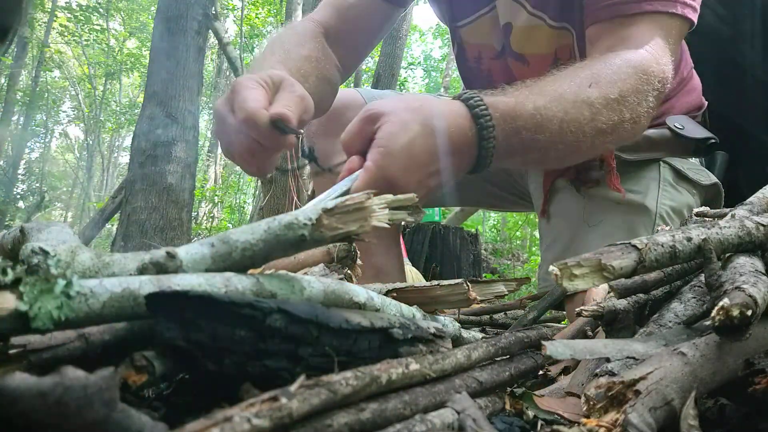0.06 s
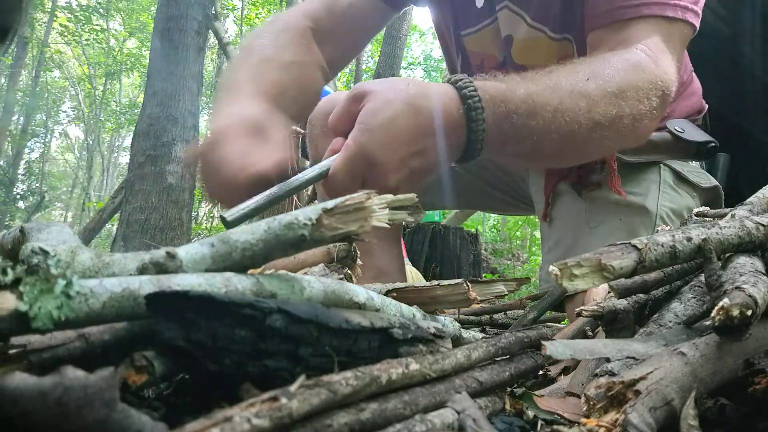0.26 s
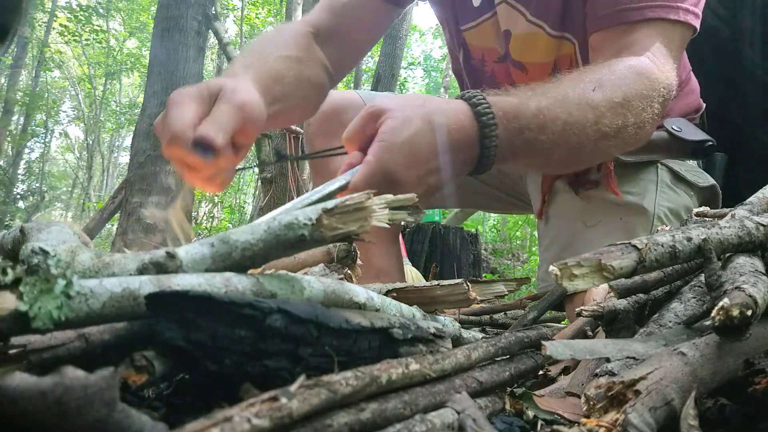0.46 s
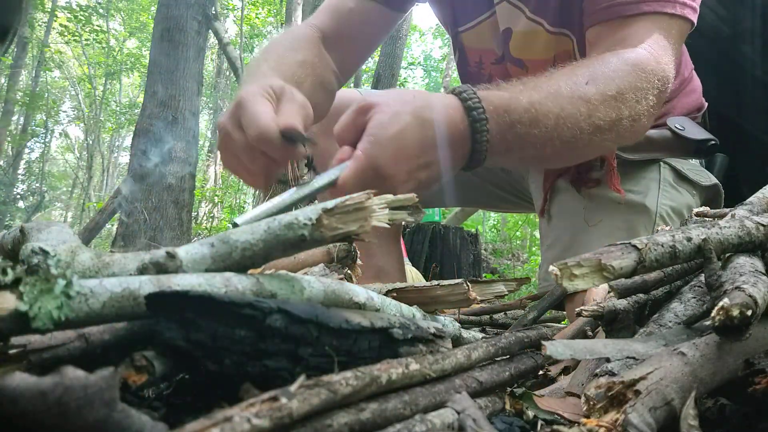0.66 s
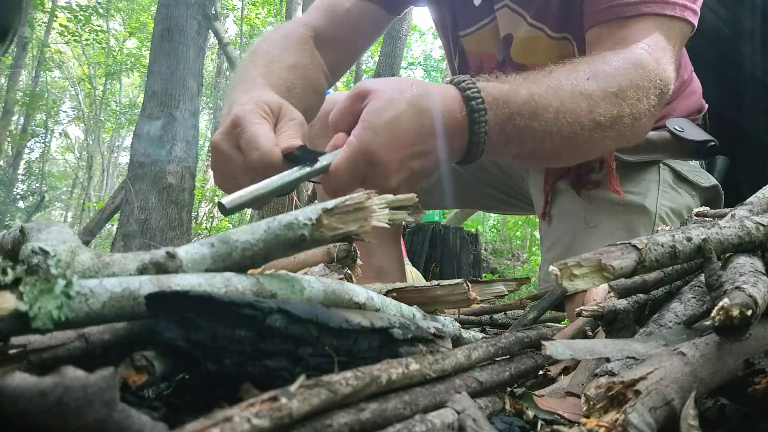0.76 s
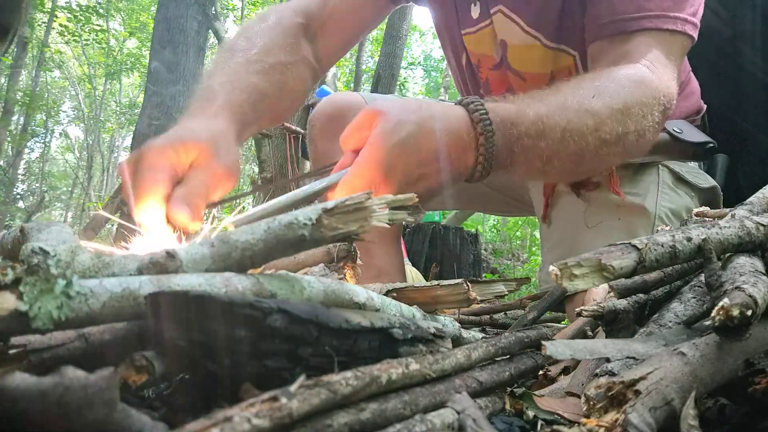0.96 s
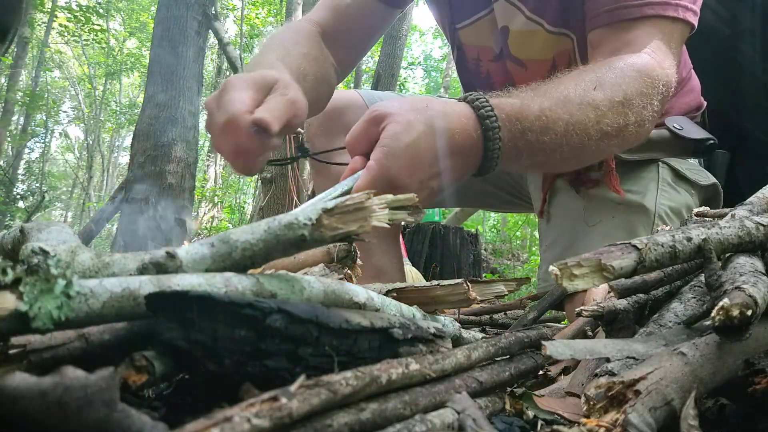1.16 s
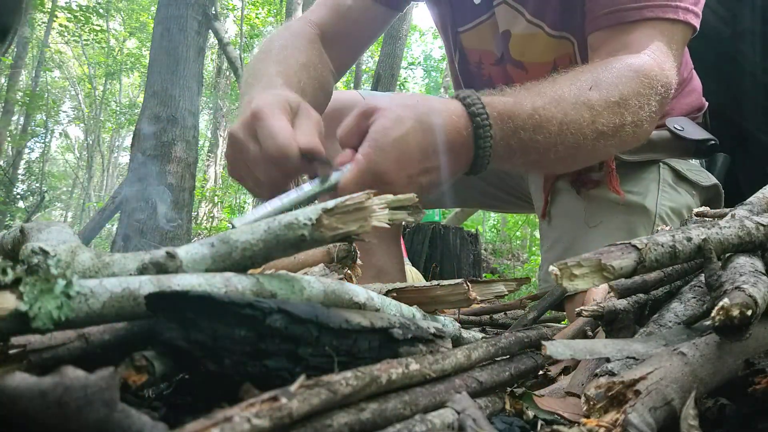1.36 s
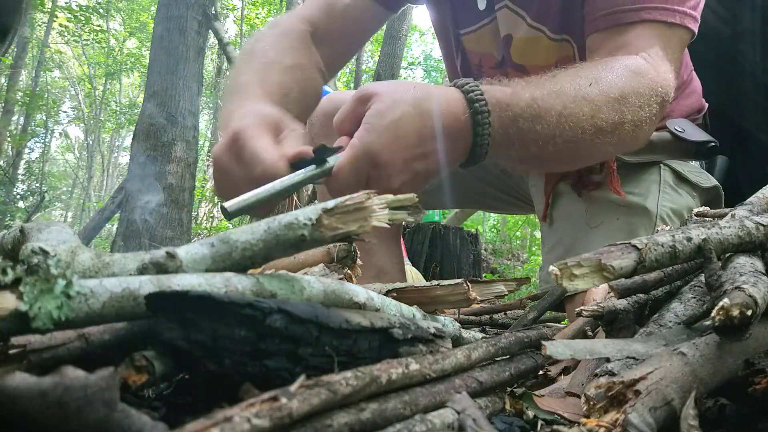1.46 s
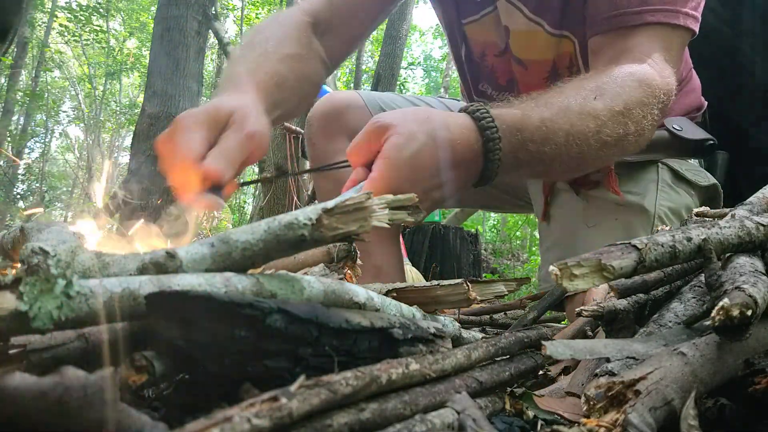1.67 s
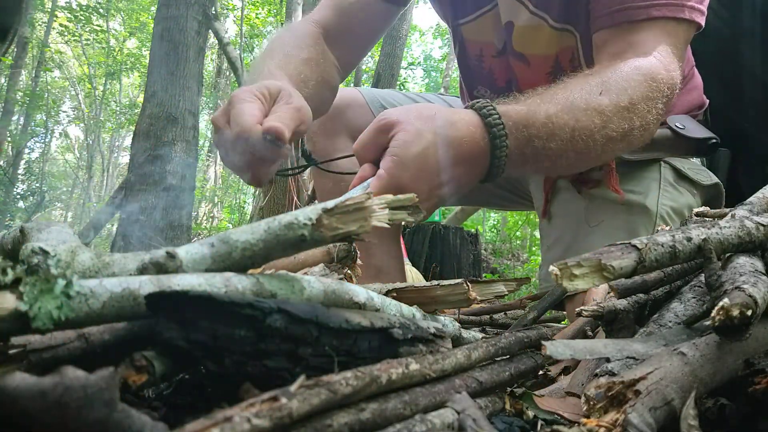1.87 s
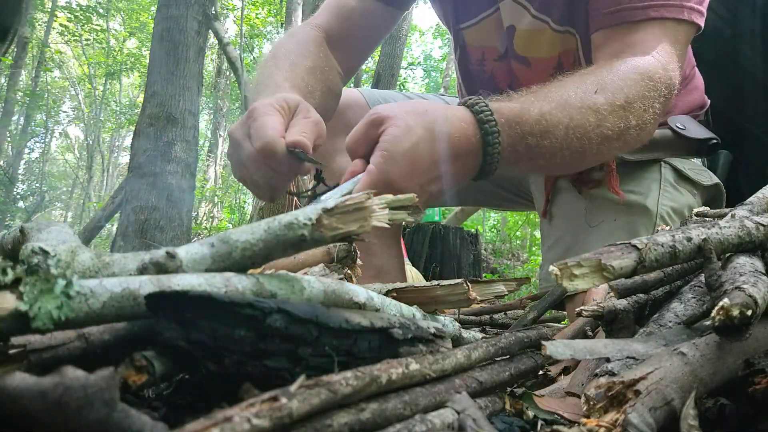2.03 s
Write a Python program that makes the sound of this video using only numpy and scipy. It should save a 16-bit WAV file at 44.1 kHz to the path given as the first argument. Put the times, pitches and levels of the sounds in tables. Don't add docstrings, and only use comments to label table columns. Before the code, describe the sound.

A steel striker scrapes a fire-starting rod, very close, in stereo. A sharp tap at 0.15 s leads into a strong bright rasp until 0.4, with dry twigs rattling. A metallic click comes at 0.68, a second scrape at 0.88, another tap at 1.35 and a third scrape at 1.48. Spark crackles and twig ticks trail to 1.85. Faint birds, insects, airy hiss and low hum continue behind.

```python
import sys
import numpy as np
from scipy import signal
from scipy.fft import rfft, irfft
from scipy.io import wavfile

SR = 44100
rng = np.random.default_rng(int(sys.argv[2]) if len(sys.argv) > 2 else 0)


def boost_factor(decibels):
    exponent = np.asarray(decibels, float) / 20
    return 10 ** exponent


def generate_wav(signal):
    frames = np.transpose(np.atleast_2d(signal))
    scaled = np.clip(frames, -1, 1) * 32767
    pcm = np.round(scaled).astype(np.int16)
    wavfile.write(sys.argv[1], SR, pcm)


N = 92610
HZ = np.fft.rfftfreq(N, 1 / SR) + 1


def in_time(rows):
    s, db = np.transpose(rows)
    return boost_factor(np.interp(np.arange(N) / SR, s, db, -150, -150))


def at_hz(points):
    points = np.array(points)
    return np.interp(np.log(HZ), np.log(points[:, 0] + 1), points[:, 1])


def rms_one(x):
    return x / np.sqrt(np.mean(x ** 2) + 1e-20)


def colour(x, spectrum):
    cepstrum = irfft(np.log(boost_factor(at_hz([(10, -70)] + list(spectrum)))), N)
    cepstrum[1:N // 2] *= 2
    cepstrum[N // 2 + 1:] = 0
    return rms_one(irfft(rfft(x) * np.exp(rfft(cepstrum)), N))


def peak(x, hz, width_hz):
    r = np.exp(-np.pi * width_hz / SR)
    top = np.array([1, 0, -1]) * (1 - r * r) / 2
    return signal.lfilter(top, [1, -2 * r * np.cos(2 * np.pi * hz / SR), r * r], x + 1e-18)


def drift(rate_hz):
    r = np.exp(-2 * np.pi * rate_hz / SR)
    wander = signal.lfilter([1], [1, -2 * r, r * r], rng.standard_normal(N + SR))
    return rms_one(wander[SR:])


def grains(per_s, spread_db):
    strength = boost_factor(spread_db * np.minimum(rng.exponential(1, N), 4))
    signed = strength * rng.standard_normal((3, N))
    return signed * (rng.random(N) < per_s / SR)


def puffs(rows, rise_s=.00045):
    out = np.zeros(N + SR)
    for s, db, length in rows:
        age = np.arange(int(4 * length * SR)) / SR
        start = int(s * SR)
        out[start:start + len(age)] += boost_factor(db - 20 * age / length) * np.minimum(age / rise_s, 1)
    return out[:N]


def scatter(x, t60_s):
    t = np.arange(N) / SR
    tail = rng.standard_normal((2, N)) * boost_factor(-60 * t / t60_s) * (t > .002)
    echoes = irfft(rfft(x, 2 * N) * rfft(tail, 2 * N))[:, :N]
    return echoes / np.sqrt(np.sum(tail[0] ** 2))


# f/Hz, common share [0-1]
PORT_LIKENESS = [(150, .96), (700, .92), (1400, .72), (2800, .62), (5000, .32), (12000, .35)]


def ports(three):
    share, w = at_hz(PORT_LIKENESS), rfft(three)
    return irfft(np.sqrt(share) * w[0] + np.sqrt(1 - share) * w[1:], N)


# f/Hz, level/dB (per Hz)
AIR_COLOUR = [(240, -13.5), (700, -13), (2600, -21.5), (3200, -24), (6500, -25), (10000, -21),
              (15000, -24.5), (15800, -51)]


def air():
    hiss = colour(ports(rng.standard_normal((3, N))), AIR_COLOUR)
    return boost_factor(-52.5 - 9.5) * hiss


# f/Hz, width [Hz], level/dB
HUM_TONES = [(80, 19.6, -65.5), (116.5, 2.26, -63.5), (135.6, 2.9, -65), (160.26, 3.1, -63),
             (211, 4, -74.5), (235, 6.1, -73)]


def hum():
    return sum(boost_factor(db) * rms_one(peak(rng.standard_normal(N), hz, width)) for hz, width, db in HUM_TONES)


def insects():
    pitch_hz, width_hz, level_db, throb_db = 7950, 800, -61.5, .5
    band = np.exp(-(2 * (HZ - pitch_hz) / width_hz) ** 2)
    buzz = rms_one(irfft(rfft(rng.standard_normal((2, N))) * band, N))
    return boost_factor(level_db + throb_db * drift(69)) * buzz


# t/s, length [s], start f/Hz, end f/Hz, level/dB
BIRD_WHISTLES = [(.622, .062, 3560, 2900, -52), (1.062, .065, 3760, 2900, -55),
                 (1.828, .05, 3200, 2850, -60), (1.385, .03, 3600, 3400, -70), (1.07, .12, 3740, 3680, -68),
                 (.39, .09, 1850, 2270, -64), (.47, .1, 2270, 2290, -64), (.74, .13, 1580, 1800, -68),
                 (1.362, .065, 1700, 2020, -58), (1.41, .045, 2020, 1980, -60),
                 (1.14, .08, 1600, 1620, -75), (2.06, .06, 1650, 1850, -70)]


def birds():
    level_db, fade_db, wet_db, wood_t60_s = 3.5, 6, -3, .9
    t, out = np.arange(N) / SR, np.zeros(N)
    for s, length, from_hz, to_hz, db in BIRD_WHISTLES:
        u = np.clip((t - s) / length, 0, 1)
        glide = from_hz + (to_hz - from_hz) * np.sin(np.pi * u / 2) ** 2
        fade = fade_db * u * (to_hz < from_hz)
        swell = np.sqrt(2 * np.sin(np.pi * u).clip(0))
        out += boost_factor(db + level_db - fade) * swell * np.sin(2 * np.pi * np.cumsum(glide) / SR)
    return out + boost_factor(wet_db) * scatter(out, wood_t60_s)


# t/s, level/dB
TWIG_SHOVES = [
    [(0, -62), (.138, -62), (.2, -52.5)],
    [(.2, -63), (.268, -53), (.28, -36), (.335, -38.5), (.42, -61), (.62, -70)],
    [(.872, -78), (.886, -45), (.92, -41), (.985, -45), (1.01, -55.5), (1.15, -63), (1.17, -95)],
    [(1.45, -83), (1.5, -43.5), (1.525, -36), (1.56, -43.5), (1.62, -51), (1.805, -57), (1.82, -97)],
]
# f/Hz, level/dB (per Hz)
TWIG_COLOUR = [(60, -14), (150, -7.5), (450, -3), (1200, -2), (2600, -2), (2900, -8), (3150, -6),
               (6000, -19.5), (9000, -23)]


def twig_rattle():
    clicks = grains(5000, 3)
    rattle = 0
    for k, hz in enumerate(150 * 2 ** np.arange(0, 6, .75)):
        clump = boost_factor(2.5 * drift(40))
        rattle = rattle + peak(clicks, hz, hz * .6) * clump * (-1) ** k
    shove = sum(in_time(curve) for curve in TWIG_SHOVES)
    return boost_factor(5) * colour(rattle, TWIG_COLOUR) * shove * boost_factor(.86 * drift(180))


# t/s, peak level/dB, f/Hz
TWIG_TICKS = [(0.235, -19.5, 6800), (0.326, -19, 2580), (1.524, -23.5, 2540), (1.619, -47, 2320),
              (1.639, -51, 2420), (1.694, -40, 2290), (1.722, -48, 2550), (1.744, -40.5, 2330),
              (1.757, -43, 2500), (1.766, -53, 2470), (0.417, -56, 1910), (.44, -50, 1490),
              (.458, -59, 1500), (0.477, -45, 2650), (0.495, -34, 1570), (0.529, -63, 1880),
              (0.578, -41.5, 2630), (1.027, -30.5, 1500), (1.082, -36.5, 1410), (1.137, -34.5, 1420),
              (1.303, -45, 2100), (1.322, -63, 4200), (1.667, -32, 2670), (1.735, -23, 2290),
              (1.777, -29.5, 2360), (1.804, -40.5, 2400), (1.853, -32.5, 2360), (1.998, -43, 2440)]


def twig_ticks():
    level_db, length_s, rise_s, cycles = 3.5, .009, .003, 6
    white, out = rng.standard_normal((3, N)), np.zeros((3, N))
    for s, db, hz in TWIG_TICKS:
        burst = white * puffs([(s, db + level_db, length_s)], rise_s)
        out += 1.8 * peak(peak(burst, hz, hz / cycles * 2), hz, hz * .23)
        if hz < 4000:
            out += 1.12 * peak(peak(burst, 1260, 1500), 900, 3000)
    return out


# t/s, peak level/dB, low share level/dB, top share level/dB, rod ring level/dB
STEEL_TAPS = [
    (.15, -9.5, -23, 5, -5),
    (0.3452, -18, -45, 16, -4),
    (0.6755, -17, -30, -2, 2),
    (1.346, -19, -27.5, 1, -7),
]
# f/Hz, level/dB, time to fall 60 dB [s]
STEEL_MODES = [(740, -20, .015), (1620, -20, .014), (2050, -16, .014), (3550, -15, .016), (6280, -5, .012),
               (10250, -5, .008), (12300, -4, .008), (5560, -20, .055), (5480, -31, .13), (5640, -30, .16),
               (5730, -31, .14), (5900, -31, .1), (4800, -14, .012)]
# f/Hz, level/dB (per Hz)
CRACK_COLOUR = [(450, -55), (750, -13.5), (2600, -21.5), (4200, -17), (6230, -0.5), (9000, -16.5),
                (12300, -1), (15800, -19.5)]


def taps():
    tap_db, crack_db, crack_s, split_hz = -2, -4, .0028, 8500
    crack = rfft(colour(rng.standard_normal((3, N)), CRACK_COLOUR))
    body = puffs([(s, db + crack_db, crack_s) for s, db, low, top, ring in STEEL_TAPS])
    bright = puffs([(s, db + top + crack_db, crack_s) for s, db, low, top, ring in STEEL_TAPS])
    out = irfft(crack * (HZ < split_hz), N) * body + irfft(crack * (HZ >= split_hz), N) * bright
    t = np.arange(N) / SR
    chance = rng.normal(0, 2, (len(STEEL_TAPS), len(STEEL_MODES), 3, 1))
    for (s, db, low, top, ring), row in zip(STEEL_TAPS, chance):
        age = np.clip(t - s, 0, 1)
        rise = np.minimum(age / .00027, 1)
        for (hz, mode_db, t60), c in zip(STEEL_MODES, row):
            if hz < 3000:
                share_db = low + 25
            else:
                share_db = top * (hz > split_hz) + ring * (t60 > .05)
            level = boost_factor(db + tap_db + mode_db + c + share_db - 60 * age / t60)
            out += level * np.sin(2 * np.pi * hz * age + 3 * c) * rise
    return out


# t/s, peak level/dB, length [s]
EDGE_SNAGS = [
    (.885, -13, .004),
    (1.484, -16, .003),
    (1.739, -24, .003),
    (1.779, -21, .003),
]


def snags():
    burst = rng.choice([-1., 1.], (3, N)) * puffs(EDGE_SNAGS, .0004)
    return peak(burst, 11000, 3000)


# t/s, level/dB
EDGE_STROKES = [
    [(.16, -73), (.215, -45.5), (.235, -33.5), (.27, -33.5), (.296, -27.5), (.336, -37.5), (.342, -40),
     (.36, -33.5), (.46, -83)],
    [(.836, -79), (.84, -41.5), (.881, -44), (.886, -30.5), (.92, -34.5), (.968, -36), (1.01, -48.5),
     (1.13, -72)],
    [(1.449, -68), (1.456, -42), (1.48, -36.5), (1.487, -32.5), (1.55, -37.5), (1.64, -52.5), (1.805, -58),
     (1.82, -70)],
]
# t/s, peak level/dB, length [s]
EDGE_CATCHES = [(.17, -36, 0.026), (.182, -30, 0.0059), (.2, -40, 0.02), (.227, -40, 0.00295),
                (.235, -36, 0.003), (.254, -26, 0.0028), (.26, -32.5, .002), (.291, -34, 0.0018),
                (.297, -39, .003), (.328, -28, 0.0067), (.274, -24, 0.021), (.284, -36.5, .012),
                (.305, -20, 0.0048), (.475, -52, 0.057), (.585, -57, 0.0092), (.838, -66, 0.012),
                (.881, -38, 0.0028), (.899, -25, 0.011), (.905, -26, .002), (.917, -33.5, 0.0048),
                (.946, -25, 0.0078), (.963, -44, 0.0053), (1.048, -38, 0.002), (1.462, -49, .004),
                (1.496, -22.5, .004), (1.504, -20.5, .002), (1.519, -25, 0.0097), (1.527, -37, 0.0027),
                (1.567, -34, 0.0047), (1.605, -46, .006), (1.683, -37.5, .004), (1.714, -47, 0.0031),
                (1.095, -45, 0.015), (1.143, -52, 0.0093), (1.2, -51.5, 0.005), (1.657, -32, 0.0043),
                (1.707, -36, .004), (1.733, -33, 0.0071), (1.744, -27.5, 0.0081), (1.771, -35.5, 0.005),
                (1.781, -34.5, 0.0081), (1.853, -44.5, 0.0062)]
# f/Hz, level/dB (per Hz)
RASP_COLOUR = [(1760, -30.5), (3000, -39), (3110, -59), (4970, -44.5), (6120, -12.5), (8130, 1),
               (11000, 12), (15700, -21)]
# f/Hz, width [Hz], level/dB
EDGE_RINGS = [(3484, 660, -7.5), (5850, 1650, 5.5), (11120, 1950, -1), (11024, 420, 11), (12230, 100, 5),
              (12220, 630, 9), (13440, 810, 7), (13400, 540, 0.5)]


def rasp():
    ring_db, patch_db, rasp_db = 4.5, 3.5, 5
    slips = grains(10000, 1.9) * boost_factor(.37 * drift(200))
    rings = 0
    for hz, width, db in EDGE_RINGS:
        swell = boost_factor(db + patch_db * drift(93))
        rings = rings + swell * peak(peak(slips, hz, width), hz, 9 * width)
    sound = rms_one(colour(slips, RASP_COLOUR) + boost_factor(ring_db) * rms_one(rings))
    pressure = sum(in_time(curve) for curve in EDGE_STROKES) * boost_factor(.5 * drift(6.7))
    return sound * (boost_factor(rasp_db) * pressure + puffs(EDGE_CATCHES))


def scene():
    near = rasp() + (twig_rattle() + twig_ticks()) + taps()
    far = birds() + (air() + hum() + insects())
    direct = near + snags()
    echoes = boost_factor(-8.5) * scatter(near[0], .033)[[0, 0, 1]]
    return ports(direct + echoes) + far


def band_limit(x):
    return signal.sosfilt(signal.butter(12, 16790, fs=SR, output="sos"), x)


# f/Hz, left minus right level/dB
PORT_LEAN = [(300, .5), (740, -4.5), (1220, 4), (2200, 2.2), (4800, 6), (7000, 3), (8800, -14.5),
             (15000, -12.5)]
# f/Hz, left lead [radians]
PORT_LEAD = [(0, 0), (600, .2), (860, 2.8), (1460, 2.2), (3010, 7.2), (4050, 13.2), (6460, 17.5),
             (16400, 30)]


def record(dry):
    top_hz, bottom_hz = 16000, 51.5
    notch_hz, notch_width_hz, notch_depth = 3150, 240, .72
    notch = 1 - notch_depth * np.exp(-((HZ - notch_hz) / notch_width_hz) ** 2)
    shared = (HZ < top_hz) * notch / (1 + (bottom_hz / HZ) ** 1.76)
    lean = boost_factor(at_hz(PORT_LEAN))
    balance = np.sqrt(2) * np.array([lean, np.ones_like(lean)]) / np.sqrt(1 + lean ** 2)
    hz, lead = np.transpose(PORT_LEAD)
    side = np.array([[1], [-1]])
    timing = np.exp(.5j * side * np.interp(HZ, hz, lead))
    mix = irfft(rfft(dry) * shared * balance * timing, N)
    return band_limit(mix)


dry = scene()
out = record(dry)
generate_wav(out)
```